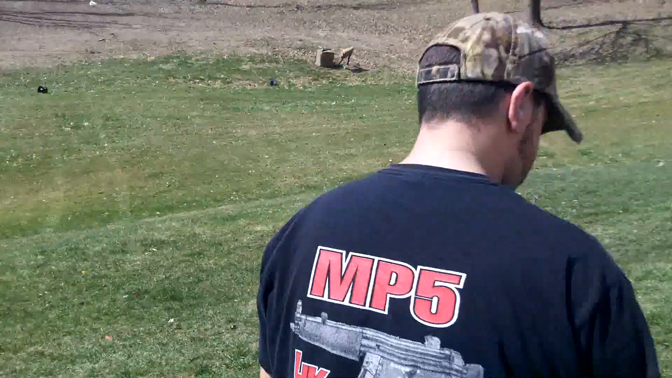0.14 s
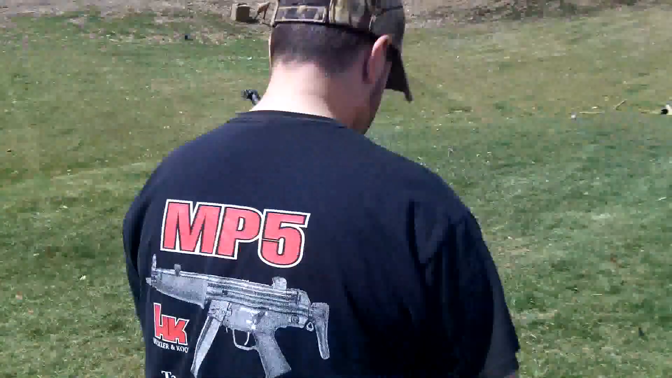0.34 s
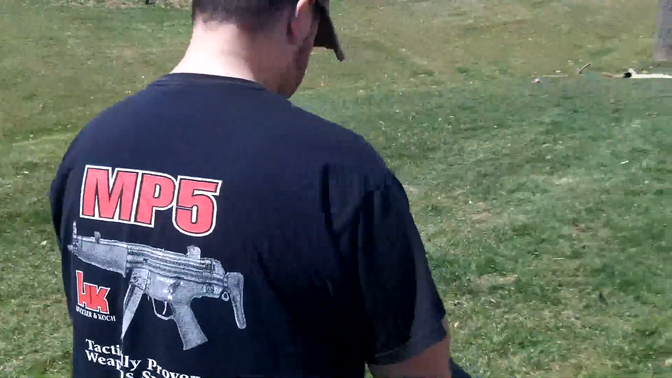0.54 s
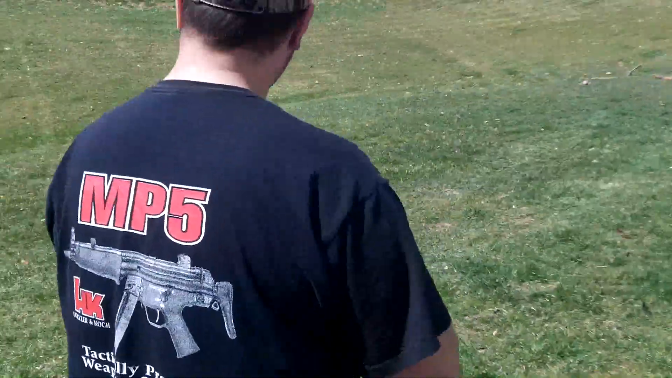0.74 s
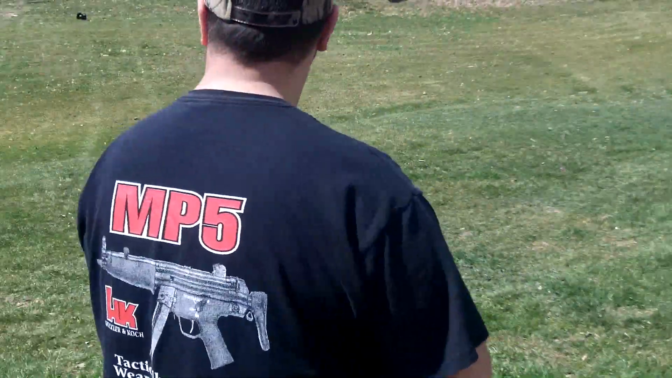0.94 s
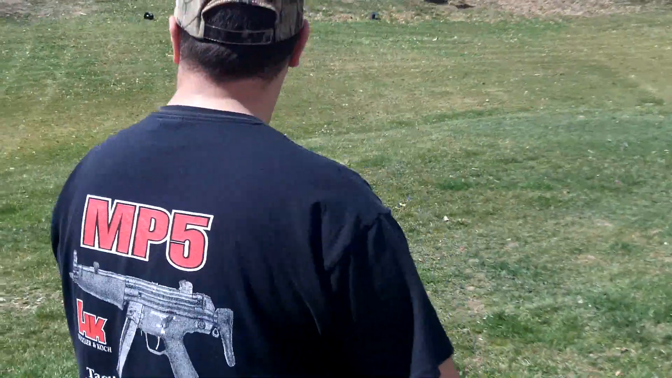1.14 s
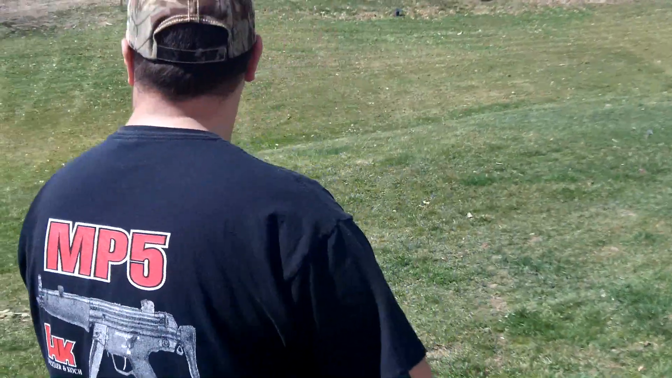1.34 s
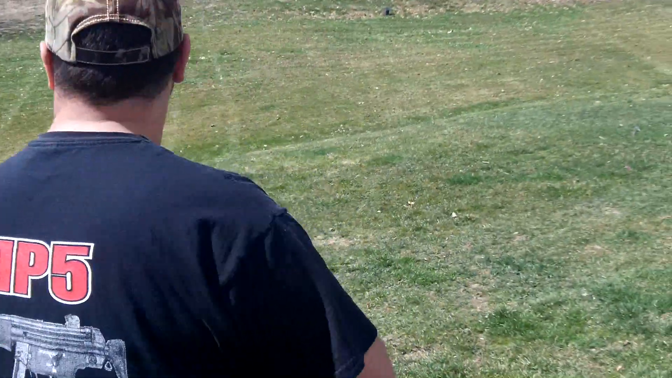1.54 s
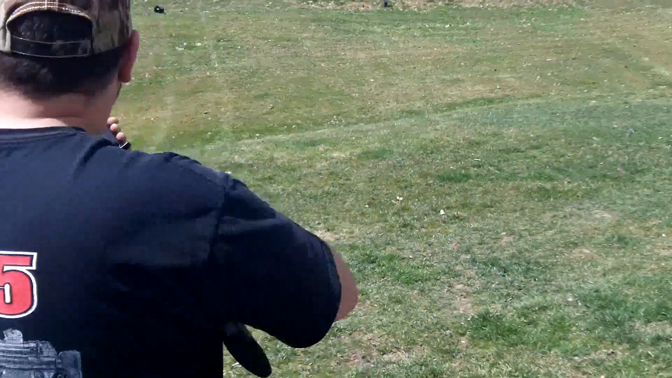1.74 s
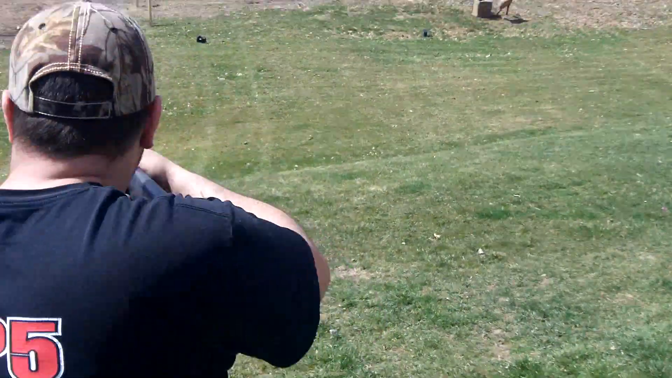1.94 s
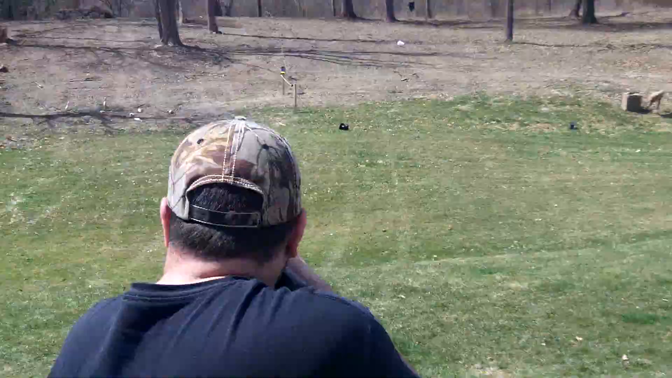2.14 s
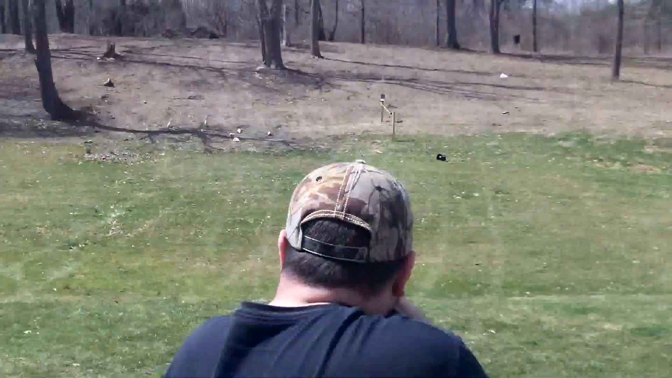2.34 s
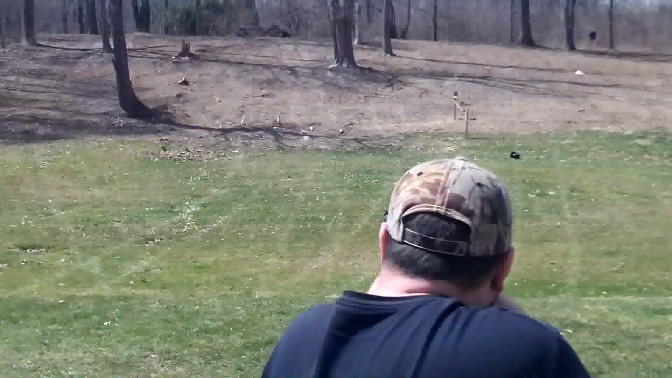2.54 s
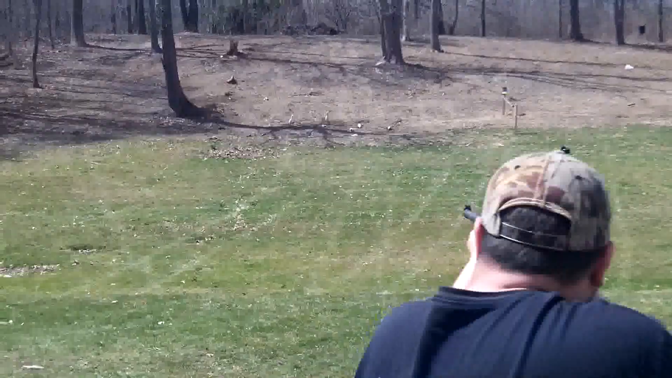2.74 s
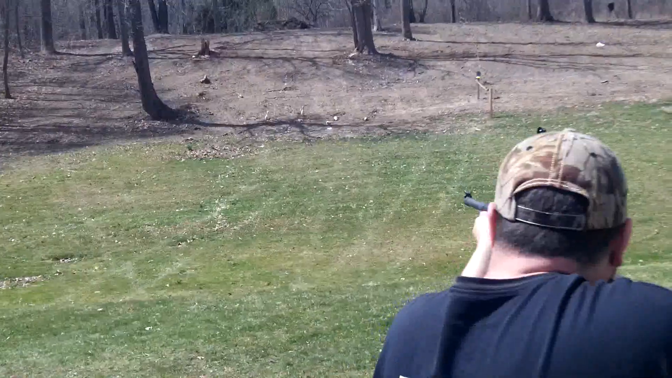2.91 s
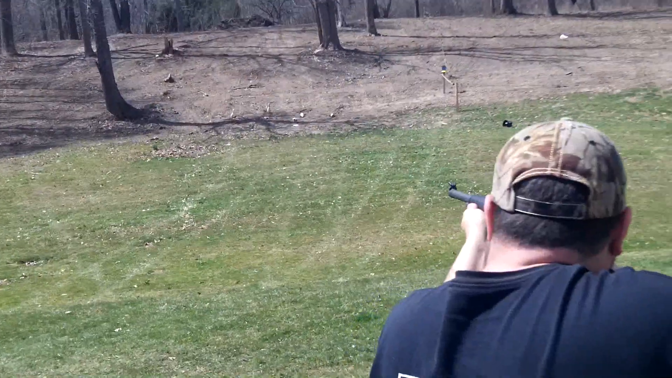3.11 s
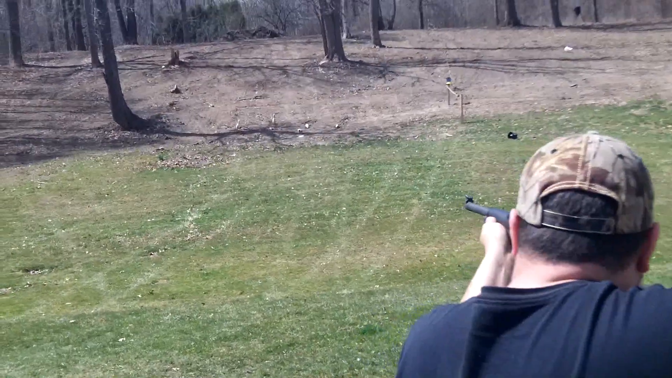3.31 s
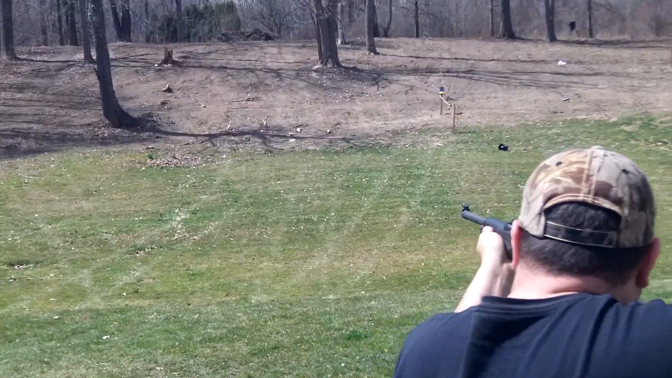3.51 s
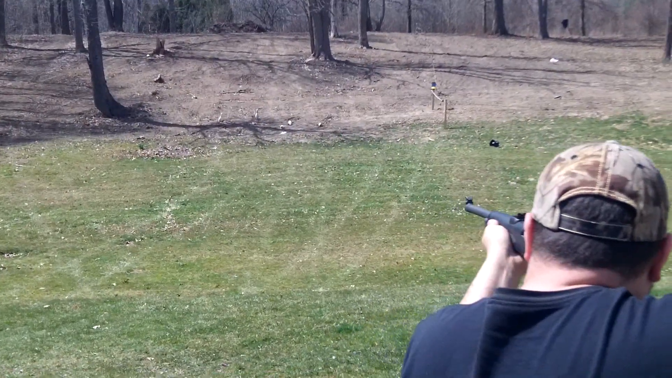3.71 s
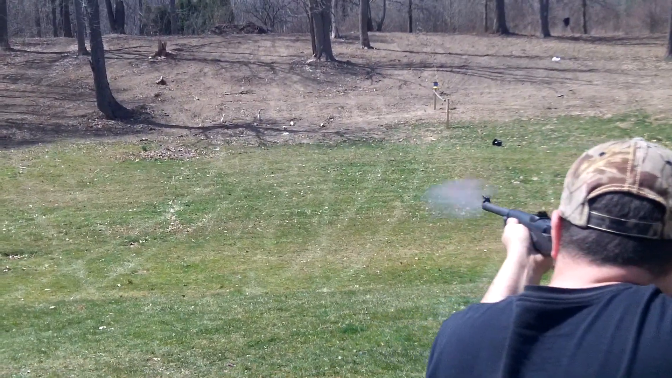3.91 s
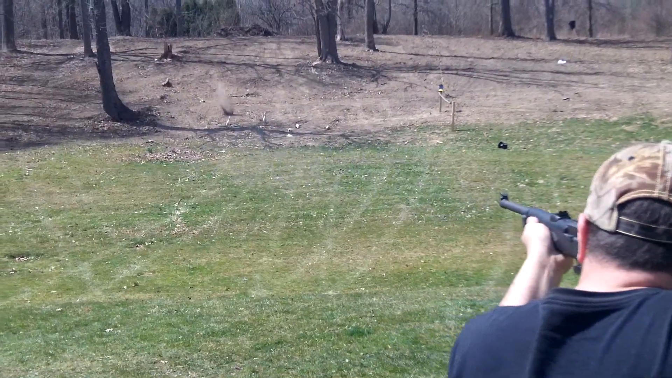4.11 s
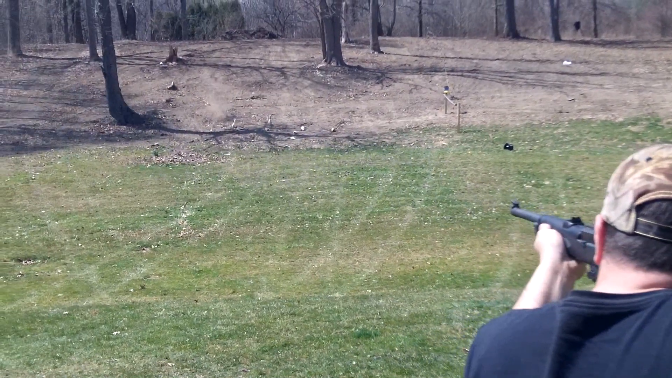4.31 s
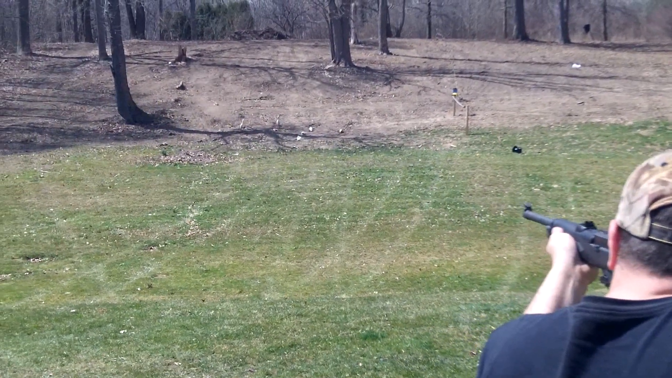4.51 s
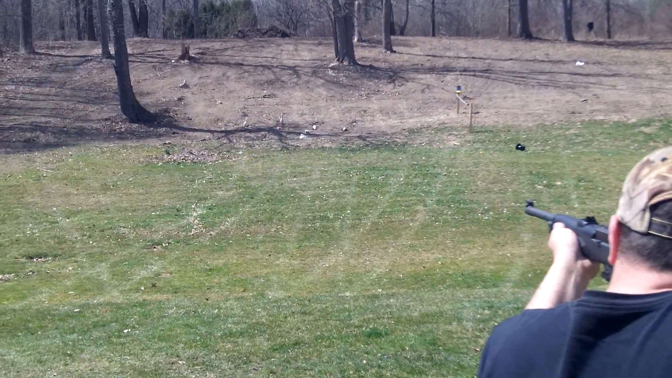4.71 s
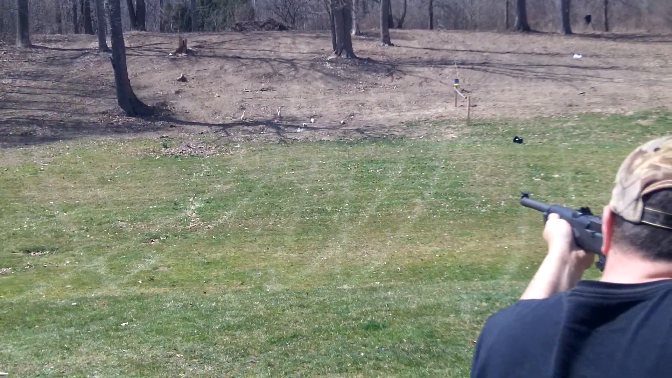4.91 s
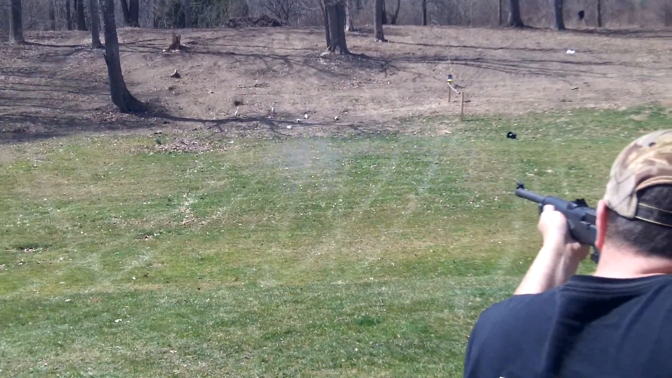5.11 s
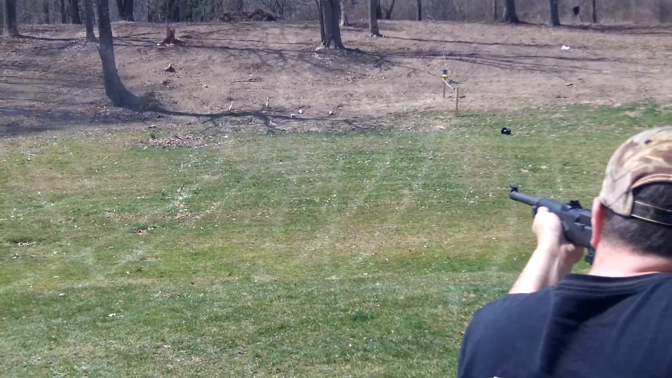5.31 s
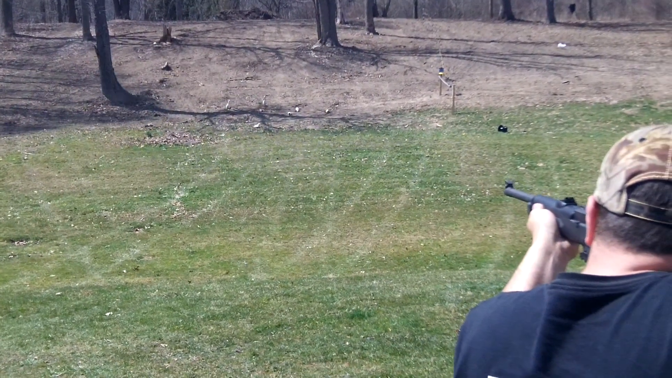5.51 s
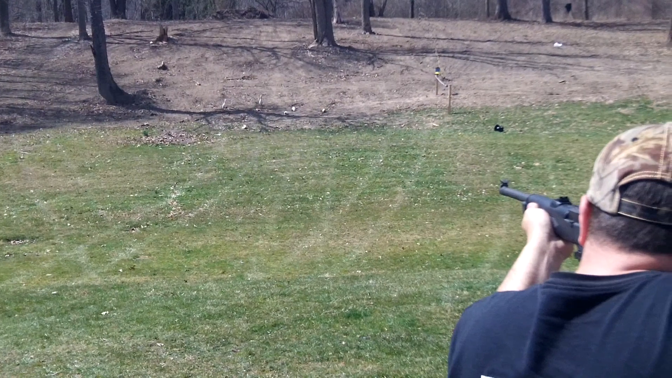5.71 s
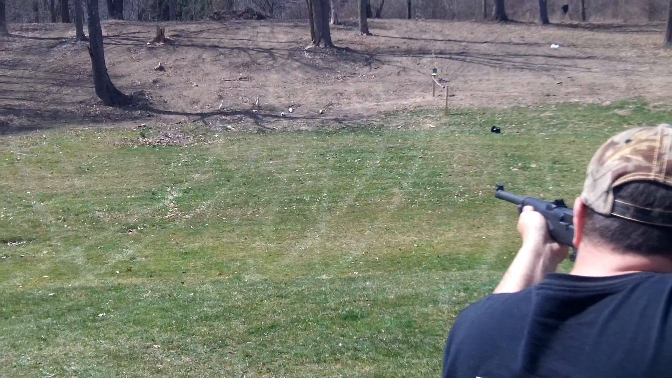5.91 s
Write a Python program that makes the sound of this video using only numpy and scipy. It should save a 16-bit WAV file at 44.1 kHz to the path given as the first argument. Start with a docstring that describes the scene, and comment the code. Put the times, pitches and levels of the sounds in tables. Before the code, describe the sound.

Open grassy range beside woods, heard close behind the shooter on a small overloaded mono microphone. Quiet wind and faint hiss first, with a sleeve rustle and a tiny double steel click. Then a hard, clipped gunshot, quick metallic bolt clatter, a cluster of echoes and a roaring woodland tail; wind gusts thump the microphone. A second similar shot follows, and its echo fades under more buffeting wind.

```python
"""A breeze rushes in the trees and rumbles on the microphone; a sleeve rustles and a gun clicks as it is readied.
Then two carbine shots ring out over a grassy range, heard from just behind the shooter, amid popping gusts.
Blasts are shaped noise and ringing modes, steel is decaying sines, echoes are short cracks in smeared noise
and the roar of the woods is a dense random train of returns, faded band by band.
Loud peaks duck the recorder's gain, which creeps back while the action cycles; what it cannot hold is clipped."""
import sys
import numpy as np
from scipy import signal
from scipy.fft import rfft, irfft, next_fast_len
from scipy.io import wavfile
from scipy.ndimage import uniform_filter1d, minimum_filter1d

SR = 44100
rng = np.random.default_rng(int(sys.argv[2]) if len(sys.argv) > 2 else 0)


def output_pcm(signal):
    """Save a mono or channel-first signal as 16-bit PCM at the path in sys.argv[1].

    Samples are clipped to [-1, 1] before scaling.
    """
    pcm = np.clip(np.atleast_2d(signal).T, -1, 1) * 32767
    wavfile.write(sys.argv[1], SR, np.round(pcm).astype(np.int16))


N = 262395
TIME = np.arange(N) / SR

# Noise colours. Each row: frequency in Hz, relative level in dB per Hz.
TREES_COLOUR = [(60, -23), (200, -8), (440, -5.5), (580, -0.5), (1100, 1), (1800, -4), (2500, -12),
                (3300, -20.5), (4700, -26), (6900, -36.5), (8200, -72), (15000, -72)]  # breeze in the trees
WIND_COLOUR = [(15, -2.5), (30, 0.5), (60, -4), (105, -4), (150, -9), (300, -13), (600, -23), (2000, -71)]  # rumble of wind on the microphone
HISS_COLOUR = [(1000, 6), (6500, -1), (9500, 4), (14500, 3.5), (15800, -13)]  # the microphone's own hiss
SLEEVE_COLOUR = [(1000, -14), (3000, 11), (4500, 5), (6300, -4), (8000, -21), (14000, -21)]  # cloth
SCRAPE_COLOUR = [(300, -6), (1000, 14), (2500, -12), (4700, 7), (6300, -5), (8000, -48), (10000, -13),
                 (15000, -36)]  # the scrape in each click of steel
GAS_COLOUR = [(40, 0), (180, 8.5), (500, -6.5), (900, 5), (1400, -16.5), (2000, -1.5), (4000, -4),
              (6500, -15), (8000, -22), (10000, -14), (15000, -39)]  # muzzle gas
WOODS_COLOUR = [(60, -10), (230, -9), (430, -4.5), (850, 0), (1350, -1), (1900, -3), (2400, -5), (3000, -5),
                (3850, -10), (4450, -9), (5300, -15.5), (6500, -18), (7800, -33), (15000, -41)]  # the roar from the woods
SLAP_COLOUR = [(80, -43), (300, -7.5), (800, -4), (1400, -2), (1900, 2), (2350, -9.5), (3000, -3),
               (3900, -14), (4500, -7.5), (6600, -23.5), (8000, -33), (14000, -12)]  # a distinct echo

# The trees hold nearly steady, then fade. Each row: time in seconds, level in dB before the sway.
TREES_LEVEL = [(0, -30.5), (1.2, -29.5), (2.8, -30), (3.25, -28.5), (3.9, -28.5), (5.9, -36)]
TREES_SWAY_DB, TREES_SWAYS_PER_S = .45, 5
# Wind on the microphone sinks to a lull, then gusts. Each row: time in seconds, level in dB before the lumps.
WIND_LEVEL = [(0, -29.5), (.22, -35), (.35, -31), (.48, -33.5), (1.8, -31.5), (3.9, -37), (4.15, -42),
              (4.38, -36), (4.47, -14.5), (4.58, -22.5), (4.68, -16.5), (4.84, -19), (5.05, -20),
              (5.17, -31), (5.25, -20), (5.3, -17), (5.46, -21.5), (5.58, -23), (5.7, -20), (5.94, -28)]
# The strongest eddies popping on the port. Each row: time in seconds, level in dB, pitch in Hz,
# half length in cycles.
BUFFETS = [(.065, -22.5, 89, 1.3), (.15, -26, 80, 1.5), (.32, -23, 83.5, 2.2), (.385, -26, 120, 1.8),
           (.89, -26, 60, .6), (1.05, -28, 70, 1.4), (2.97, -28, 79, 2.2), (4.476, -8, 240, 1),
           (4.567, -11, 268, 2.4), (4.787, -6, 275, 0.85), (4.797, -10, 300, .8), (4.871, -6, 130, 0.5),
           (4.927, -6.5, 340, 1.5), (4.992, -17, 330, 1.5), (5.0354, -6.5, 360, 0.5),
           (5.232, -13, 330, 1.4), (5.268, -9, 480, 1.1), (5.311, -9.5, 500, 1.8), (5.412, -10, 330, 1.8),
           (5.47, -20, 100, 1.3), (5.648, -14, 300, 1.2), (4.8488, 4, 440, .65), (5.671, -8, 230, 1.6),
           (5.7505, -5.5, 290, 1.3), (5.788, -8.5, 262, 0.75), (5.797, -13, 75, 1.1)]

# Sleeve brushing the stock. Each row: time in seconds, level in dB before the grain.
SLEEVE_LEVEL = [(.28, -63), (.35, -49), (.388, -47), (.397, -42), (.41, -47), (.425, -44), (.44, -50),
                (.468, -49), (.51, -72)]
SLEEVE_GRAIN_DB = 4

# Ringing of the steel action. Each row: pitch in Hz, level in dB, t60 in seconds.
ACTION_MODES = [(1250, 2, .005), (1830, 2, 0.014), (2670, 10, 0.0033), (3136, 2, 0.0081),
                (4540, -23, 0.023)]
# The latch snaps and rebounds as the gun is readied. Each row: time in seconds, ring level in dB,
# contact pitch in Hz, scrape level in dB.
READYING = [(.6021, 1, 2180, -16.5), (.6065, -2.5, 3350, -27)]
# The bolt hits its rear stop, rebounds and closes. Each row: seconds after the shot, ring level in dB,
# contact pitch in Hz, scrape level in dB.
BOLT_CYCLE = [(0.0466, -5, 3100, -4), (0.0505, -3.5, 3000, -8), (.0865, -6.5, 2000, -11)]
CONTACT_S = .0002  # time that a steel contact takes to build up
OFF_PITCH_DB = 20  # how much less a contact drives a mode an octave from its pitch

# The shots. Each row: start in seconds, blast level in dB, pressure thump in dB, lag of the ground bounce
# in seconds, lead of the echoes in seconds, woods level in dB, hold of the woods in seconds.
SHOTS = [(4.0380, 31, 17, .0074, 0.0015, 1, 0.15), (5.084, 29.5, 16.5, .0072, 0.0036, 1, 0.2)]
# Shock front and first reflections off gun and shooter. Each row: lag in seconds, level in dB.
SHOCK_FRONTS = [(0, 7), (.00098, 11), (.00245, 15), (.00345, 11.5)]
# Ringing of the blast round gun and shooter. Each row: pitch in Hz, width in Hz, level in dB.
BLAST_MODES = [(880, 390, 5.5), (1690, 220, -13), (1920, 260, 5.5), (3040, 170, 8.5), (3560, 250, 2),
               (4140, 130, 7), (4680, 200, 6), (5160, 74, 1.5), (6210, 160, -1)]

# Scatter from the field dies quickly; the roar of the woods starts later, swells, holds and fades.
FIELD_DB, FIELD_FADE_DB_PER_S = -3, 260
TRUNKS_PER_S = 14000  # mean density of returns
GRAIN_DB, PATCHY_DB = 1.1, .9  # grain of the returns, unevenness from band to band
WOODS_START_S, WOODS_ONSET_S = .075, .025
WOODS_DB, WOODS_FULL_S = -11, 0.46
WOODS_SWELL_DB, WOODS_SWELL_S, WOODS_FADE_DB_PER_S = 8.5, 0.3, 27.5

# The field, bank and nearest trunks. Each row: echo delay in seconds, length in seconds, level in dB for
# the first shot, level in dB for the second (both before the slap trim), crack above the smear in dB.
REFLECTORS = [(.098, 0.03, -23, -17.5, -6), (0.145, 0.02, -32, -20, -10), (0.1995, .003, -13, -3.5, 8),
              (0.2126, 0.0045, -1.5, -3.5, 15.5), (0.2503, .004, -13, -5, 8),
              (0.2733, 0.0064, -2.5, -5, 12), (.297, .003, -24, -13, 6), (.3102, .0015, -3.5, -20, 10),
              (.3406, .011, -11, -13, 3), (.374, .008, -12, -9, 5), (.3918, .008, -6, -8, 7),
              (.4372, .003, -13, -1.5, 11), (.4768, .008, -20, -9, 6), (.615, .018, -8, -11, 5),
              (.7552, .002, -26, 2.5, 8)]
SLAP_TOP_HZ, SLAP_DULLING_OCT_PER_S = 8500, 4  # top edge at no delay, sinking with delay
SLAP_RISE_S, SLAP_T60_S = .00026, .014
CRACK_S = 0.00028  # overpressure of the returning shock front
CUTOFF_HZ = 15500  # the recorder's top cut


def from_db(db):
    """Turn decibels into gain."""
    return 10 ** (np.asarray(db) / 20)


def rms_one(x):
    """Scale to rms 1."""
    return x / np.sqrt(np.mean(x ** 2) + 1e-20)


def curve(rows):
    """Join (seconds, value) rows by straight lines."""
    return np.interp(TIME, *np.transpose(rows))


def tint(source, colour):
    """Give a source a spectrum, at rms 1."""
    size = next_fast_len(N)
    hz, db = np.transpose(colour)
    bins = np.maximum(np.fft.rfftfreq(size, 1 / SR), 1)
    gain = from_db(np.interp(np.log(bins), np.log(hz), db))
    return rms_one(irfft(rfft(source, size) * gain, size)[:N])


def noise(colour):
    """Noise of rms 1 with the given spectrum."""
    return tint(rng.standard_normal(N), colour)


def drift(rate):
    """Smooth random movement of rms 1 that changes about rate times a second."""
    return rms_one(np.interp(TIME * rate, np.arange(N // 8), rng.standard_normal(N // 8)))


def cut(x, hz, kind, order=2):
    """Butterworth filter."""
    sos = signal.butter(order, np.minimum(hz, SR / 2 - 1), kind, fs=SR, output="sos")
    return signal.sosfilt(sos, x + 1e-18)


def resonate(x, hz, width_hz):
    """A resonance with gain of about 1 at its top."""
    r = np.exp(-np.pi * width_hz / SR)
    zeros = np.array([1, 0, -1]) * (1 - r * r) / 2
    poles = [1, -2 * r * np.cos(2 * np.pi * hz / SR), r * r]
    return signal.lfilter(zeros, poles, x + 1e-18)


def burst(age, length, t60):
    """Envelope that holds for a length and then dies away."""
    return from_db(-60 * np.maximum(age - length, 0) / t60)


def add(track, s, sound):
    """Mix a short sound into a track at a time."""
    start = int(round(s * SR))
    track[start:start + len(sound)] += sound[:N - start]


def grains(colour, count):
    """Unrelated tenth-of-a-second pieces of one noise, and their time axis."""
    size = SR // 10
    return noise(colour)[:count * size].reshape(count, size), TIME[:size]


def breeze(lump_db=1.0, hum_db=-46, hum_hz=166, swirl=0.16, shove=0.18, shove_s=0.0038):
    """Trees rush, eddies rumble and pop on the microphone by swinging its pressure, and something hums far away."""
    trees_db = curve(TREES_LEVEL) + TREES_SWAY_DB * drift(TREES_SWAYS_PER_S)
    trees = from_db(trees_db) * noise(TREES_COLOUR)
    rumble = from_db(curve(WIND_LEVEL) + lump_db * drift(22)) * noise(WIND_COLOUR)
    turbulence = rms_one(cut(rng.standard_normal(N), [100, 550], "band"))
    for s, db, hz, cycles in BUFFETS:
        age = TIME - s
        swell = np.exp(-np.minimum((age * hz / cycles) ** 2, 20))
        dip = -swell * np.cos(2 * np.pi * hz * age)  # a dip in pressure between smaller rises
        wake_level = (1 + np.tanh(age * hz * 2)) / 2 * np.exp(-np.minimum(np.abs(age) / 0.014, 20))
        wake = swirl * turbulence * wake_level
        body = -shove * np.exp(-np.minimum((age / shove_s) ** 2, 20))  # the whole eddy sucks at the port
        rumble += from_db(db) * (dip + body + wake)
    hum = resonate(resonate(rng.standard_normal(N), hum_hz, 10), hum_hz, 10)
    return trees + rumble + from_db(hum_db) * rms_one(hum)


def hiss(hiss_db=-56.0):
    """The microphone's own steady noise."""
    return from_db(hiss_db) * noise(HISS_COLOUR)


def sleeve():
    """Cloth rustles in fine ticks as the gun is handled: noise with a rapidly wavering level."""
    return from_db(curve(SLEEVE_LEVEL) + SLEEVE_GRAIN_DB * drift(300)) * noise(SLEEVE_COLOUR)


def action(scrape_t60=0.016):
    """Steel parts meet, in readying and after every shot: modes near the contact pitch ring, and noise scrapes."""
    out = np.zeros(N)
    contacts = list(READYING) + [(s + lag, *contact) for s, *_ in SHOTS for lag, *contact in BOLT_CYCLE]
    scrapes, age = grains(SCRAPE_COLOUR, count=len(contacts))
    build_up = 1 - np.exp(-(age / CONTACT_S) ** 2)
    for (s, db, pitch, scrape_db), piece in zip(contacts, scrapes):
        ring = np.zeros(len(age))
        for k, (hz, level, t60) in enumerate(ACTION_MODES):
            mode_db = db + level - OFF_PITCH_DB * np.log2(hz / pitch) ** 2
            sign = (-1) ** k  # neighbours start in opposite directions
            ring += sign * from_db(mode_db) * np.sin(2 * np.pi * hz * age) * burst(age, 0, t60)
        scrape = from_db(scrape_db) * piece * burst(age, 0, scrape_t60)
        add(out, s, (ring + scrape) * build_up)
    return out


def blasts(gas_s=0.00296, gas_t60=0.0008, gas_db=-5, stir_db=-7, ring_db=-2,
           ground_db=-12, ground_t60=0.027, ground_ring_db=-9,
           thump_s=0.0058, suction_s=0.011, suction_db=-9,
           punch_s=0.00066, punch_db=-2, turf_db=-24, turf_t60=0.045):
    """Shocks and turbulent gas set off ringing; a bounce off the grass follows with a slow swing of pressure."""
    out = np.zeros(N)
    jets, age = grains(GAS_COLOUR, count=2 * len(SHOTS))
    shocks = sum(from_db(db) * np.sinc((age - lag) * SR - 2) for lag, db in SHOCK_FRONTS)
    punch = (1 - age / punch_s) * np.exp(-age / punch_s)  # overpressure, then suction
    suction = from_db(suction_db) * age / suction_s * np.exp(-age / suction_s)
    swing = cut(np.exp(-age / thump_s) - suction, 510, "low")
    for (s, db, thump_db, lag, *_), jet, scatter in zip(SHOTS, jets[::2], jets[1::2]):
        gas = jet * burst(age, gas_s, gas_t60)
        drive = shocks + from_db(stir_db) * gas
        ringing = sum((-1) ** k * from_db(level) * resonate(drive, hz, width)
                      for k, (hz, width, level) in enumerate(BLAST_MODES))
        # the punch enters with its polarity flipped
        direct = from_db(gas_db) * gas + from_db(ring_db) * ringing - from_db(punch_db) * punch
        add(out, s, from_db(db) * direct)
        bounce = scatter * burst(age, 0, ground_t60) + from_db(ground_ring_db) * ringing
        bounce = cut(bounce, 5800, "low")
        add(out, s + lag, from_db(db + ground_db) * bounce + from_db(thump_db) * swing)
        # the turf close by scatters it
        turf = cut(scatter[::-1], [900, 7000], "band") * burst(age, 0.013, turf_t60)
        add(out, s, from_db(db + turf_db) * turf)
    return out


def scatter_level(age, hold_s):
    """Strength of the scatter after a shot: the field at once, the woods late, swelling, holding and fading."""
    swell_db = WOODS_SWELL_DB * np.clip((age - WOODS_FULL_S) / WOODS_SWELL_S, -1, 0)
    fade_db = WOODS_FADE_DB_PER_S * np.maximum(age - WOODS_FULL_S - hold_s, 0)
    onset = np.clip((age - WOODS_START_S) / WOODS_ONSET_S, 0, 1)
    roar = from_db(WOODS_DB + swell_db - fade_db) * onset
    field = from_db(FIELD_DB - FIELD_FADE_DB_PER_S * age)
    return np.hypot(field, roar)


def woods(air_db_per_s=13, bass_lack_db=12):
    """Countless trunks return a grainy roar; the longer the path, the more treble the air takes."""
    hits = rng.random(N) < TRUNKS_PER_S / SR
    returns = hits * rng.standard_normal(N) * from_db(GRAIN_DB * drift(130))
    centres = [150, 450, 900, 1500, 2300, 3300, 4600, 6300, 9000]  # band centres in Hz
    size, out = next_fast_len(N), np.zeros(N)
    spectrum, bins = rfft(tint(returns, WOODS_COLOUR), size), np.fft.rfftfreq(size, 1 / SR)
    for hz, share in zip(centres, np.eye(len(centres))):
        band = irfft(spectrum * np.interp(bins, centres, share), size)[:N]  # overlapping bands
        loss_db_per_s = air_db_per_s * (hz / 4500) ** 2  # air_db_per_s holds at 4500 Hz
        power = 0
        for s, *_, woods_db, hold_s in SHOTS:
            age = np.maximum(TIME - s, 0)
            # until the bank answers at about 0.2 s, the scatter returns little bass
            grass_db = bass_lack_db * np.exp(-hz / 900) * np.clip((.2 - age) / 0.024, 0, 1)
            gain = from_db(woods_db - loss_db_per_s * age - grass_db)
            power = power + (age > 0) * (scatter_level(age, hold_s) * gain) ** 2
        out += band * np.sqrt(power) * from_db(PATCHY_DB * drift(45))
    return out


def echoes():
    """Every shot comes back from the same reflectors: rows of (s, delay s, dB, length s, crack dB)."""
    return [(s + delay - early, delay, levels[k], length, crack_db)
            for k, (s, _, _, _, early, *_) in enumerate(SHOTS)
            for delay, length, *levels, crack_db in REFLECTORS]


def slaps(slap_db=1.5):
    """Distinct echoes: a dry crack amid the blast smeared by what it hit, duller the farther it went."""
    out = np.zeros(N)
    rows = echoes()
    pieces, age = grains(SLAP_COLOUR, count=len(rows))
    for (s, delay, db, length, crack_db), piece in zip(rows, pieces):
        smear = piece * burst(age, length, SLAP_T60_S) * (1 - np.exp(-age / SLAP_RISE_S))
        phase = np.maximum(age - length / 2, 0) / CRACK_S  # the crack comes halfway through
        crack = (phase > 0) * (1 - phase) * np.exp(-phase)
        top_hz = SLAP_TOP_HZ * 2 ** (-SLAP_DULLING_OCT_PER_S * delay)
        echo = cut(smear + from_db(crack_db) * crack, top_hz, "low", order=1)
        add(out, s, from_db(db + slap_db) * cut(echo, 6700, "low", order=6))
    return out


def scene():
    """Everything that reaches the microphone, and its own hiss, on one channel."""
    return (blasts() + action() + sleeve() + slaps() + woods() + breeze() + hiss())[None]


def release(db, db_per_s):
    """Follow a level up at once and down at a steady rate."""
    return np.maximum.accumulate(db + db_per_s * TIME) - db_per_s * TIME


def gain_control(x, limit_db=-1, depth_db=28, fast_db_per_s=92, slow_db_per_s=21,
                 slow_below_db=5, slow_depth_db=11):
    """Peaks duck the gain, which springs most of the way back and then creeps the rest; gain in dB."""
    peak = -minimum_filter1d(-np.abs(x), size=64)
    over_db = np.clip(20 * np.log10(peak + 1e-9) - limit_db, 0, depth_db)
    slow_db = np.clip(release(over_db - slow_below_db, slow_db_per_s), 0, slow_depth_db)
    duck_db = np.maximum(release(over_db, fast_db_per_s), slow_db)
    return -uniform_filter1d(duck_db, size=24)


def record(dry, notch_hz=7900, notch_width_hz=1700, notch_share=0.87):
    """Gain control, overload of what it cannot hold, a hollow in the recorder's treble, and the top cut."""
    held = dry * from_db(gain_control(dry[0]))
    clipped = .95 * held / (1 + held ** 6) ** (1 / 6)
    hollowed = clipped - notch_share * resonate(clipped, notch_hz, notch_width_hz)
    top_cut = signal.ellip(10, .1, 80, CUTOFF_HZ, fs=SR, output="sos")
    return signal.sosfilt(top_cut, hollowed)


dry = scene()
out = record(dry)
output_pcm(out)
```